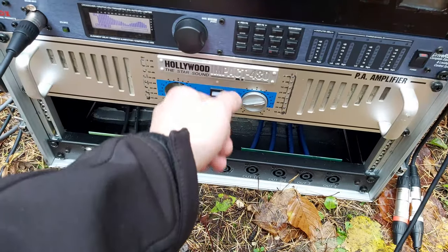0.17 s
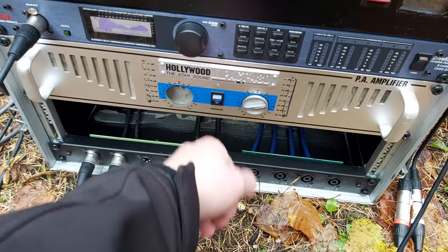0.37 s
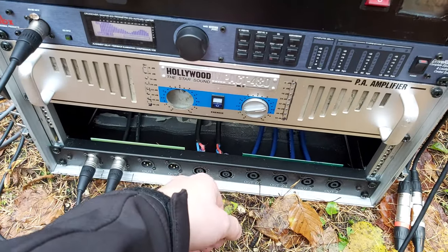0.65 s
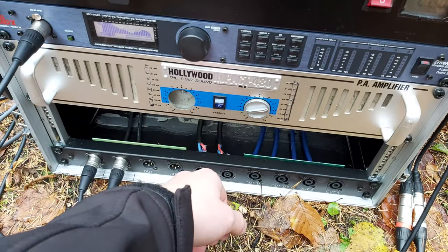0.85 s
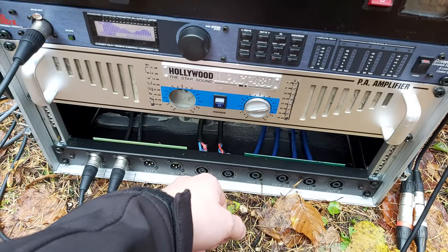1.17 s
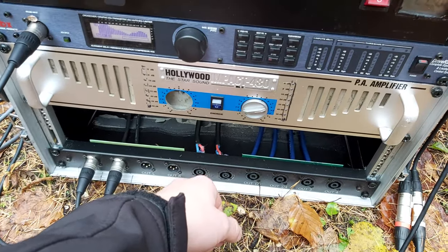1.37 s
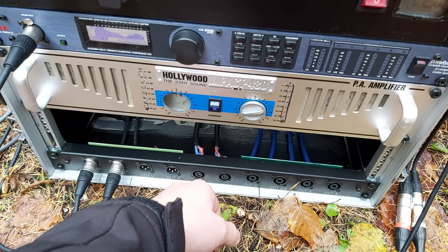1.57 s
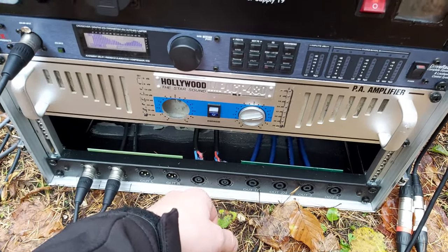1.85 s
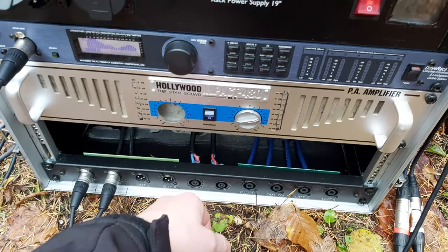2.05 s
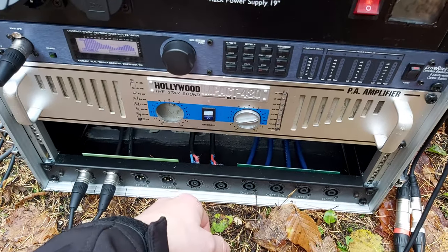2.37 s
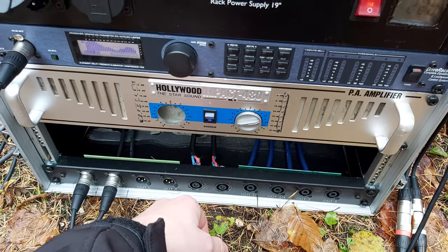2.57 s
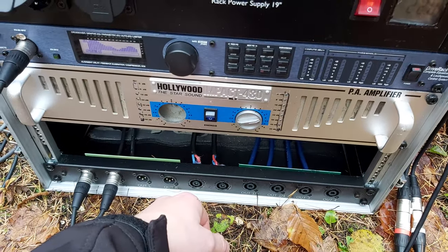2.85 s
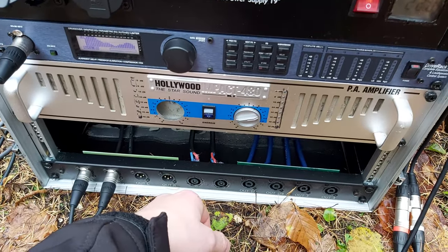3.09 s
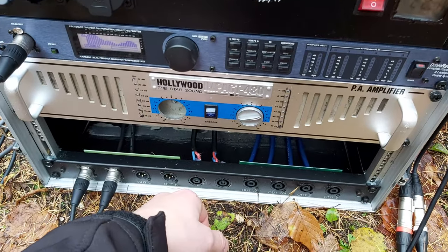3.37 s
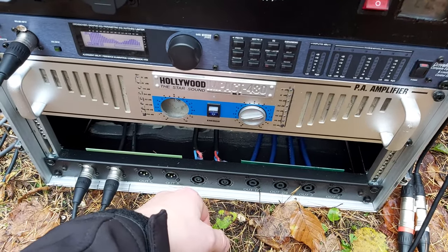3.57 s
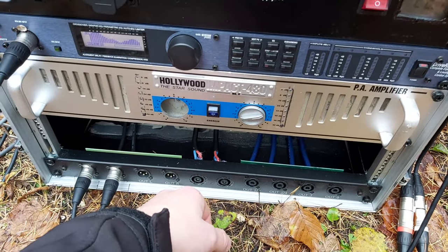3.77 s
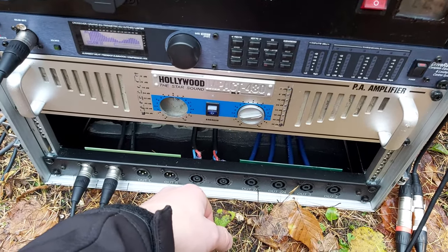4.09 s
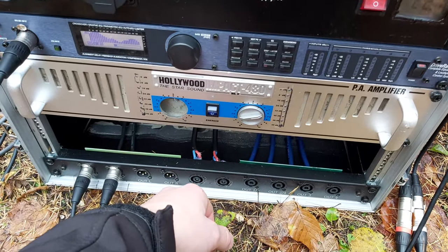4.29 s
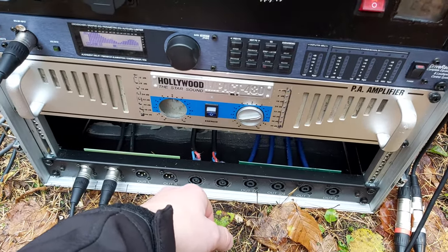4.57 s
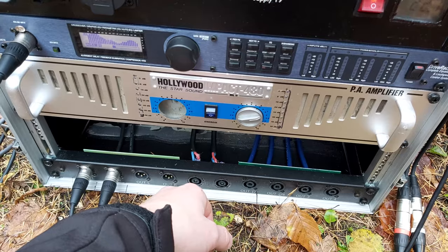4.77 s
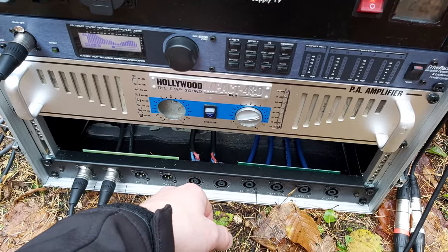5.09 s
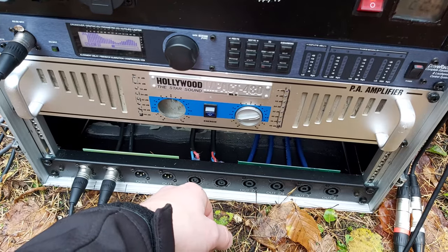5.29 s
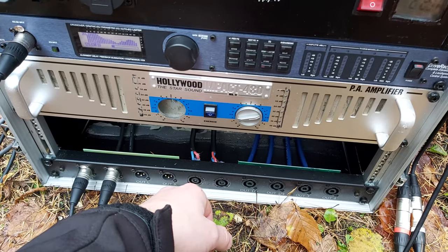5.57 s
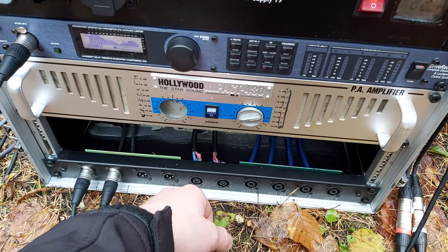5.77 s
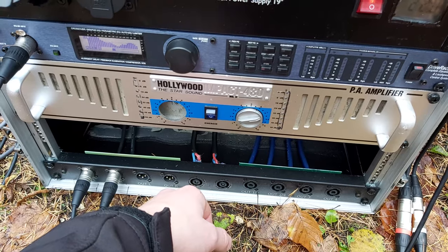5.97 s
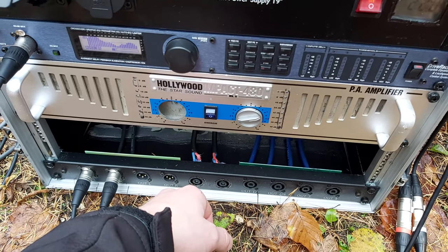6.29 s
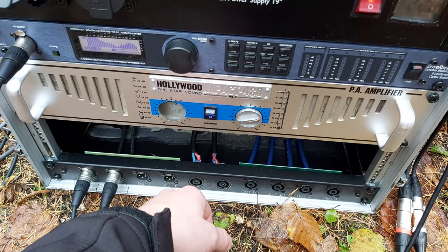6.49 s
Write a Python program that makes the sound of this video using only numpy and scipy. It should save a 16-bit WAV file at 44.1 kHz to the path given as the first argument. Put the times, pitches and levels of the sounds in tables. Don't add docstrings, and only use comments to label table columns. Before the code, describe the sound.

Deep, uneven engine throbbing and broad airy roar run continuously, then the bass falls away abruptly and a brighter motor roar rises and holds.

```python
import sys
import numpy as np
from scipy import signal
from scipy.io import wavfile
from scipy.ndimage import uniform_filter1d

SR = 44100
rng = np.random.default_rng(int(sys.argv[2]) if len(sys.argv) > 2 else 0)


def attenuation_scalar(level_db):
    decades = np.asarray(level_db, float) / 20
    return 10 ** decades


def wav_record(signal):
    frames = np.transpose(np.atleast_2d(signal))
    bounded = np.clip(frames, -1, 1)
    quanta = np.round(bounded * 32767).astype(np.int16)
    wavfile.write(sys.argv[1], SR, quanta)


N = 292824
HOP, SIZE = 512, 2048

# (time [s], level [dB])
RUMBLE_LEVEL = [
    (0.0, -17),
    (2.3, -16.5),
    (3.6, -18),
    (4.3, -19),
    (4.48, -26),
    (4.9, -29),
    (5.0, -26),
    (6.0, -23),
    (6.64, -25.5),
]
# (frequency [Hz], density [dB per Hz])
RUMBLE_SPECTRUM = [(14, -58), (30, -35), (46, -12.5), (62, 0), (78, -0.5), (92, 2), (110, -3), (126, -14),
                   (146, -16.5), (162, -22.5), (200, -31.5), (300, -72)]
# (frequency [Hz], left minus right [dB])
RUMBLE_BALANCE = [(40, -8.5), (75, -2.5), (160, -1.5)]
# (time [s], centre [Hz])
THRUM_CENTRE = [(0.0, 84), (0.83, 77.5), (1.1, 87), (2.37, 81), (2.61, 88), (3.5, 91), (4.83, 93),
                (6.36, 85), (6.64, 89)]
# (time [s], level over the load [dB])
THRUM_SURGES = [(0.46, 2.5), (0.57, 2), (0.92, 1.5), (1.05, 2), (1.24, 2), (1.52, 3.5), (2.34, 6),
                (3.18, 6), (3.37, 4.5), (3.55, 5), (3.98, 2), (4.1, 8), (4.27, 5), (6.03, 4)]
# (time [s], level against the load [dB])
THRUM_LULLS = [(0.26, -5), (0.53, -4), (1.33, -4), (1.55, -6.5), (1.68, -5.5), (2.02, -4.5), (2.52, -7.5),
               (3.14, -7.5), (3.83, -3), (3.92, -7), (4.16, -4.5), (6.32, -3), (6.58, -12)]

# (time [s], level [dB])
ROAR_LEVEL = [
    (0.0, -40),
    (2.3, -40.5),
    (2.45, -41.5),
    (4.64, -39.5),
    (4.86, -38),
    (4.9, -36.5),
    (5.8, -32.5),
    (6.64, -32.5),
]
# (frequency [Hz], share [1])
SWELL_SHARE = [(150, 0.49), (300, 0.68), (600, 0.86), (1200, 1.1), (2500, 0.76), (4200, 0.85), (6000, 0.36),
               (9000, 0.43), (14000, 0.56)]
# (frequency [Hz], level [dB])
FIRST_COLOURS = [
    [(210, 1.2), (350, 4), (700, -4.5), (1300, -20.5), (2500, -11), (4200, -23.5), (6500, -24.5),
     (9500, -39.5), (12000, -35), (14000, -37), (15600, -40.5)],
    [(210, 2.2), (350, 2.1), (700, -9.5), (1300, -8), (2500, -6), (4200, -8), (6500, -26.5), (9500, -34.5),
     (12000, -34), (14000, -32), (15600, -40)],
]
# (frequency [Hz], level [dB])
SETTLED_COLOURS = [
    [(210, -7.5), (350, -0.9), (700, -5.5), (1300, -17), (2500, -14), (4200, -20), (6500, -22), (9500, -38),
     (12000, -38), (14000, -34), (15600, -46)],
    [(210, -6), (350, 1.2), (700, -10), (1300, -7.5), (2500, -8), (4200, -10.5), (6500, -21.5),
     (9500, -33.5), (12000, -26.5), (14000, -31), (15600, -41)],
]
# (frequency [Hz], width [Hz], depth [dB])
LEFT_FIRST_NOTCHES = [(287, 164, -10.5), (465, 65, -11), (574, 92, -24), (740, 170, 6.5), (834, 630, -31),
                      (1102, 50, 1), (1236, 73, -6), (1310, 174, 9), (1490, 254, -10), (1785, 800, -14),
                      (2186, 250, -31), (2454, 210, -13), (2745, 140, -30), (2943, 170, -26),
                      (3180, 228, -10), (3440, 160, -12), (3910, 191, -11), (4140, 101, -6),
                      (4700, 303, -14), (5030, 860, -24), (5840, 799, -7), (6010, 94, 9), (7250, 540, -3),
                      (9345, 740, -7), (10100, 799, -6), (10300, 169, -7), (11060, 792, 1.5),
                      (12500, 920, -11), (14434, 400, -7.1), (15061, 799, -11)]
# (frequency [Hz], width [Hz], depth [dB])
RIGHT_FIRST_NOTCHES = [(270, 110, -7.5), (558, 164, -26), (795, 79, -4.5), (928, 136, -37),
                       (1093, 68, -4.5), (1524, 300, -8), (1710, 500, -8.5), (2062, 314, -20),
                       (2496, 460, -29), (2813, 160, -8.5), (3014, 124, -11), (3262, 460, -15.5),
                       (3643, 156, -31), (3840, 130, -18), (4050, 170, -5), (4350, 100, -18),
                       (4700, 700, -17), (5200, 530, -13), (5320, 136, 11.5), (5780, 780, -6),
                       (6080, 350, 7.5), (6600, 50, 2), (6940, 250, -2), (7600, 330, -9), (7460, 218, -3),
                       (8000, 182, -8), (9191, 418, -6), (13200, 270, -4.6), (14461, 799, -12.5),
                       (15032, 446, -11.7)]
# (frequency [Hz], width [Hz], depth [dB])
LEFT_SETTLED_NOTCHES = [(476, 28, -7), (573, 130, -20), (834, 180, -40), (960, 217, -23), (973, 180, -3),
                        (1343, 44, 5), (1480, 102, -4.5), (1470, 75, -12), (1770, 550, -10),
                        (2170, 220, -19), (2460, 83, -11), (2712, 94, -17.5), (2924, 176, -21),
                        (3650, 850, -17), (4030, 90, -13), (4540, 250, -5), (4850, 750, -24.0),
                        (5290, 380, -16), (5750, 520, -18), (5990, 80, -10), (6720, 1100, -8.5),
                        (7200, 620, -7.5), (7670, 50, 8.5), (8670, 565, -4), (9400, 880, -12),
                        (9740, 96, 9), (13200, 200, -9), (12080, 200, -12), (14513, 540, -11),
                        (14978, 890, -13)]
# (frequency [Hz], width [Hz], depth [dB])
RIGHT_SETTLED_NOTCHES = [(548, 160, -34), (783, 92, -5), (926, 158, -26), (1506, 205, -9.5),
                         (1714, 483, -13), (2093, 221, -10.5), (2410, 195, -25), (2694, 356, -15),
                         (2986, 81, -18), (3280, 200, -5.5), (3592, 300, -22), (3794, 91, -23),
                         (4416, 920, -13.5), (4790, 860, -27), (5144, 126, -22), (5740, 450, -9),
                         (6070, 54, 5.5), (6370, 460, -4.5), (7060, 260, -5.5), (7330, 930, -11.5),
                         (7880, 270, -10), (7970, 128, 4.6), (8160, 300, -6), (13200, 200, -9),
                         (9000, 190, -13), (11450, 170, 2.5), (11300, 690, -10), (12080, 500, -15),
                         (14542, 237, -11.3), (15100, 799, -17.3)]
# (time [s], settled [0-1])
CAMERA_POSE = [
    (0, 0),
    (1.6, 0.22),
    (2.0, 0.76),
    (2.6, 0.77),
    (6.64, 0.97),
]
# (time [s], gain [dB])
FACING_GAIN = [
    (1.55, 0),
    (1.72, 5.5),
    (1.84, 2),
    (1.92, 2.5),
]
# (frequency [Hz], share [1])
FACING_SHARE = [(3500, 0.06), (4300, 1), (6300, 0.6), (7500, 0.25)]
# (frequency [Hz], level [dB])
DRONE_SPECTRUM = [(40, -36), (90, -0.5), (130, 5), (165, 7.5), (180, -5.5), (200, -9.5), (240, -31),
                  (400, -90)]
# (frequency [Hz], lead of the right [rad])
RIGHT_LEAD = [(40, 0.13), (300, 0.32), (600, 0.39), (900, 2), (2300, 1.4), (2700, 3), (6000, 3),
              (7400, 2.5), (8100, 1), (8450, -4), (9300, -9.5), (9800, -8.5), (11600, -7.5), (13500, -12.5)]
# (frequency [Hz], level against the roar [dB])
TREE_SCATTER = [(100, -20), (400, -26.5), (1500, -23), (5000, -17.5), (9000, -10.5), (14000, -11)]


def rumble():
    size, hop = 2 * SIZE, 2 * HOP
    frames, hz = N // hop + 5, np.fft.rfftfreq(size, 1 / SR)
    middle_hz, lean_db, apart_db = 84, 14, -18
    centre_hz = follow(THRUM_CENTRE, np.arange(frames) * hop / SR)
    octaves = np.log2(np.clip(hz, 50, 120) / middle_hz)[:, None]
    lean = attenuation_scalar(lean_db * np.log2(centre_hz / middle_hz) * octaves)
    balance_db, lead = read(RUMBLE_BALANCE, hz), read(RIGHT_LEAD, hz)
    shared = chance(frames, size)
    spectra = []
    for side in (-1, 1):
        gain = attenuation_scalar(read(RUMBLE_SPECTRUM, hz) - side * balance_db / 2)
        path = gain * np.exp(0.5j * side * lead)
        pressure = shared + attenuation_scalar(apart_db) * chance(frames, size)
        spectra.append(lean * pressure * path[:, None])
    thrum = ironed(sounded(spectra, size, hop))
    t = np.arange(N) / SR
    level_db = follow(RUMBLE_LEVEL, t) + bumps(THRUM_SURGES, 0.027, t) + bumps(THRUM_LULLS, 0.032, t)
    return attenuation_scalar(level_db) * thrum / np.sqrt(np.mean(thrum.mean(0) ** 2))


def ironed(x):
    steady = 0.9
    lumps = uniform_filter1d(uniform_filter1d(x.mean(0) ** 2, size=1500), size=1500)
    return x / (lumps + 0.05 * lumps.mean()) ** (steady / 2)


def bumps(rows, width_s, t):
    return sum(db * np.exp(-((t - s) / width_s) ** 2) for s, db in rows)


def roar():
    frames, hz = N // HOP + 5, np.fft.rfftfreq(SIZE, 1 / SR)
    t = np.arange(frames) * HOP / SR
    level_db, base_db, drone_pan_db = -39.5, -40, -2.0
    settled = np.clip(follow(CAMERA_POSE, t), 0, 1)
    swell_db = read(SWELL_SHARE, hz)[:, None] * (follow(ROAR_LEVEL, t) - base_db)
    facing_db = read(FACING_SHARE, hz)[:, None] * follow(FACING_GAIN, t)
    flutter = patches(frames, 8, 24)
    direct = chance(frames, SIZE)
    notches = [(LEFT_FIRST_NOTCHES, LEFT_SETTLED_NOTCHES), (RIGHT_FIRST_NOTCHES, RIGHT_SETTLED_NOTCHES)]
    spectra = []
    for k in range(2):
        colour = roar_colour(k, hz, settled, flutter)
        path = colour * echo_path(*notches[k], hz, settled)
        drone = attenuation_scalar(read(DRONE_SPECTRUM, hz) + (1 - k) * drone_pan_db)[:, None]
        lead = np.exp(1j * k * read(RIGHT_LEAD, hz))[:, None]
        heard = (path + drone) * direct * lead + scattered(colour + drone, hz)
        spectra.append(attenuation_scalar(swell_db + facing_db) * heard)
    return attenuation_scalar(level_db) * sounded(spectra, SIZE, HOP)


def roar_colour(k, hz, settled, flutter):
    flutter_db, drift_db = 1.3, 1.95
    first_db = read([(140, -45)] + FIRST_COLOURS[k], hz)[:, None]
    last_db = read([(140, -45)] + SETTLED_COLOURS[k], hz)[:, None]
    drift = patches(len(settled), 200, 6)
    return attenuation_scalar((1 - settled) * first_db + settled * last_db + flutter_db * flutter + drift_db * drift)


def echo_path(first_notches, last_notches, hz, settled):
    wander = 0.35
    first, last = notched(first_notches, hz)[:, None], notched(last_notches, hz)[:, None]
    phase = wander * patches(len(settled), 60, 14)
    return np.exp((1 - settled) * first + settled * last + 1j * phase)


def notched(notches, hz):
    f, width, db = np.transpose(notches)[:, :, None]
    return np.log(1 - (1 - attenuation_scalar(db)) / (1 + 2j * (hz - f) / width)).sum(0)


def patches(frames, long, wide):
    bins = SIZE // 2 + 1
    field = uniform_filter1d(rng.standard_normal((frames, bins)), long, axis=0)
    field = uniform_filter1d(field, wide, axis=1)
    field = field / np.sqrt(np.mean(field ** 2) + 1e-20)
    return field.T * np.clip((np.arange(bins) / 330) ** 1.4, 0, 1)[:, None]


def scattered(colour, hz):
    return attenuation_scalar(read(TREE_SCATTER, hz))[:, None] * colour * chance(colour.shape[1], SIZE)


def chance(frames, size):
    a, b = rng.standard_normal((frames, size // 2 + 1, 2)).T
    return a + 1j * b


def sounded(spectra, size, hop):
    return signal.istft(np.array(spectra), nperseg=size, noverlap=size - hop)[1][:, :N]


def read(points, hz):
    f, value = np.transpose(points)
    return np.interp(np.log(hz + 1), np.log(f + 1), value)


def follow(rows, t):
    s, value = np.transpose(rows)
    return np.interp(t, s, value)


def scene():
    return rumble() + roar()


def top_cut(x):
    return signal.sosfilt(signal.butter(12, 15770, fs=SR, output="sos"), x)


def record(dry):
    cut = signal.butter(3, 36, "high", fs=SR, output="sos")
    mix = signal.sosfilt(cut, dry)
    return top_cut(mix)


dry = scene()
out = record(dry)
wav_record(out)
```